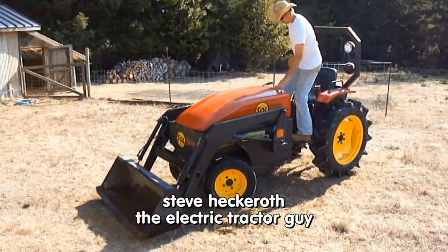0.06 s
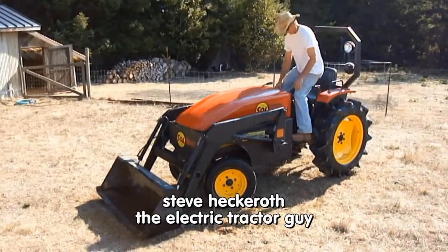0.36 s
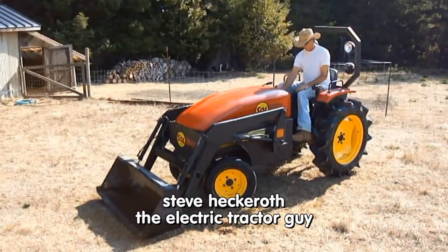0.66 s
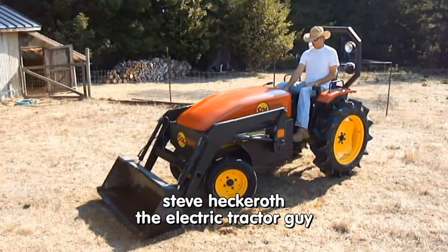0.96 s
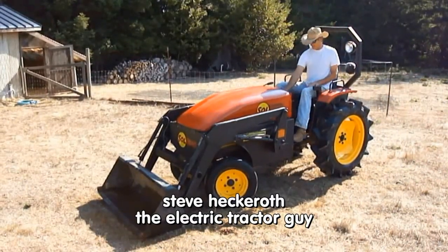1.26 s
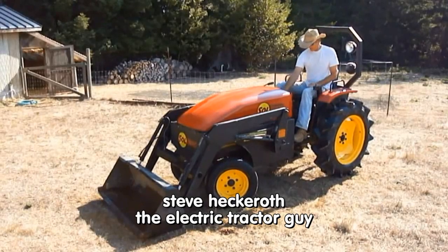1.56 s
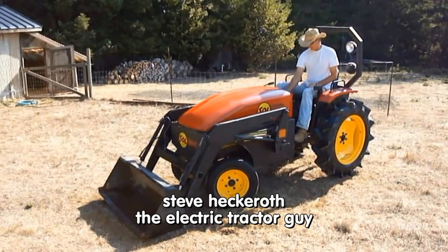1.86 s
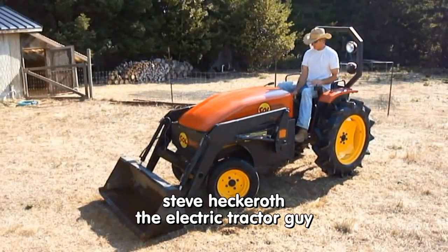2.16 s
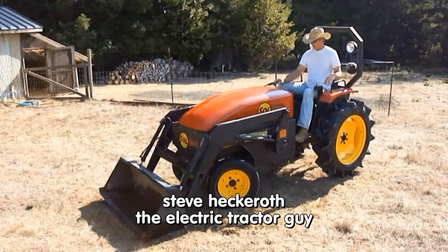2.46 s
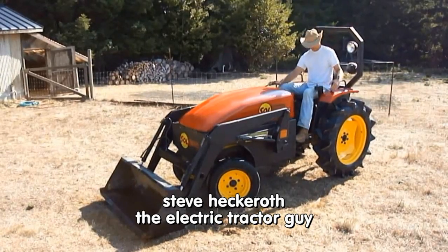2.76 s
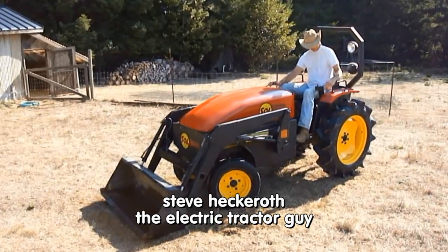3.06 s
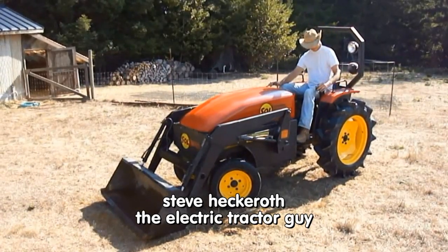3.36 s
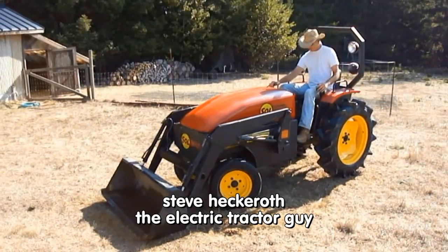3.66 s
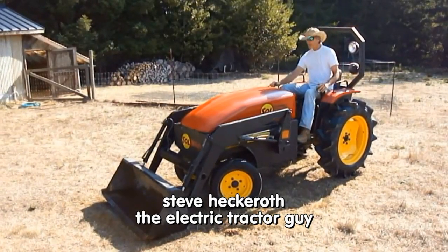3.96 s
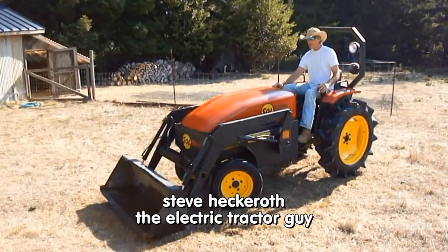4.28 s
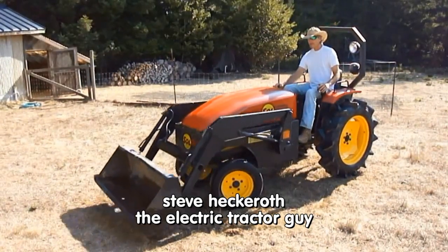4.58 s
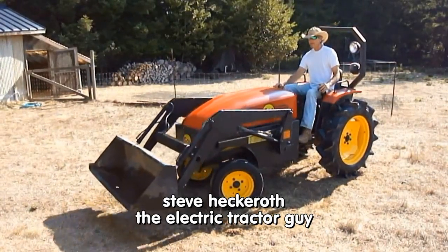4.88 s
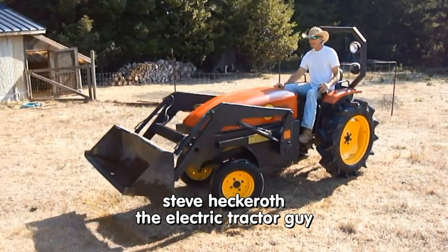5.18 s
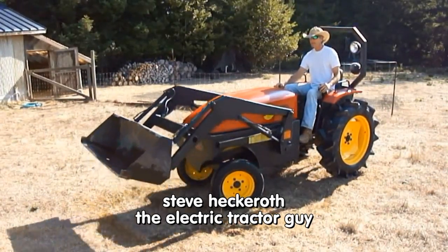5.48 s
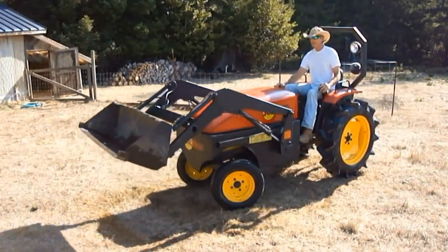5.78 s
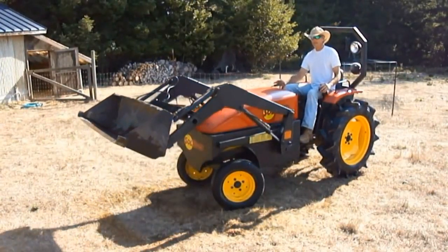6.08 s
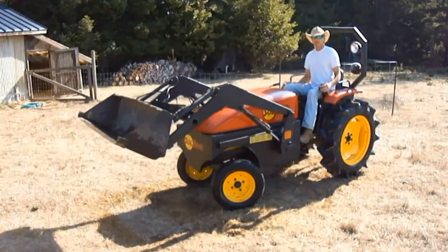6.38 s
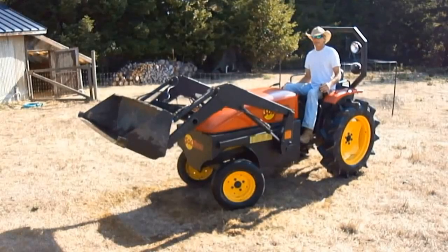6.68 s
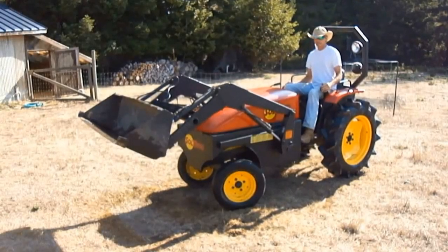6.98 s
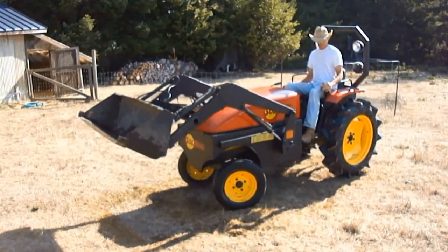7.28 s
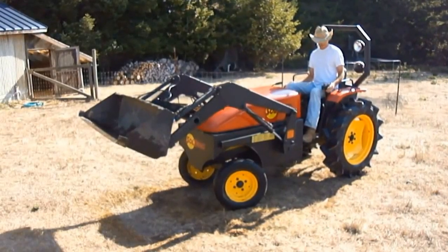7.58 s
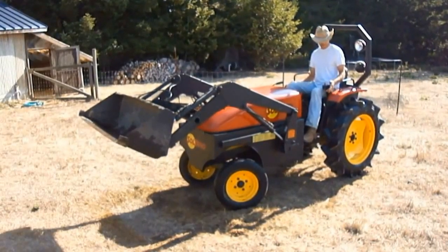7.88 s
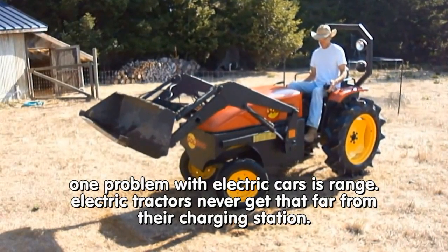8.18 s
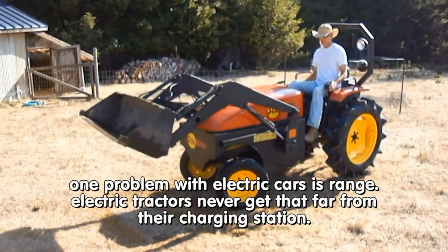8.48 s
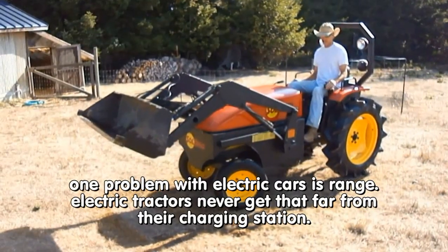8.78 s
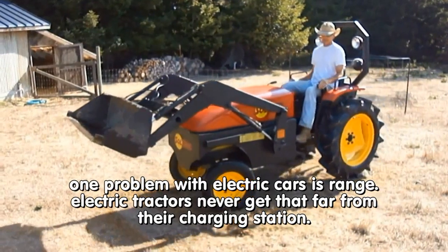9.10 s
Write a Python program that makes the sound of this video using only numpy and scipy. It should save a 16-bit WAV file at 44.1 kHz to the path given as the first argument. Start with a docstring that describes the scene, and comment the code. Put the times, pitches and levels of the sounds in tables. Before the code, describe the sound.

In a quiet field, cloth rustles on a seat with light knocks, and a switch clacks sharply on an electric tractor a few metres away. Its hydraulic pump spins up into a steady whine for about two seconds as the loader lifts, then winds down. The drive motor whirs briefly and coasts to rest. Levers clack, the gears engage with a clunk, and a low grinding begins.

```python
"""A quiet dry field, with an electric tractor a few metres away. Cloth rubs on the seat as the driver
settles and works the switches. The hydraulic gear pump spins up, its teeth pulsing the oil into a whine
while the loader lifts, and runs down. A contactor starts the brushed drive motor, which revs briefly
and coasts to rest. Levers clack, the gears take up with a clunk and the tractor moves off."""
import sys
import numpy as np
from scipy import signal
from scipy.fft import rfft, irfft, next_fast_len
from scipy.io import wavfile
from scipy.ndimage import uniform_filter1d

SR = 44100
rng = np.random.default_rng(int(sys.argv[2]) if len(sys.argv) > 2 else 0)


def wrap_up_sound(samples):
    """Save the sound to the file named by the first command line argument, as 16-bit audio."""
    columns = np.atleast_2d(samples).T
    # keep every value between -1 and 1, then stretch to whole-number steps
    tamed = np.clip(columns, -1, 1)
    steps = np.round(tamed * 32767).astype(np.int16)
    wavfile.write(sys.argv[1], SR, steps)


N = 407484
TIME = np.arange(N) / SR
PUMP_ON_S, PUMP_OFF_S, PUMP_REST_S = 4.195, 6.035, 7.05
QUIET_HZ = 253  # below this tooth rate the gears fall quiet

# Modes of the chassis. Each row: frequency in Hz, relative level in dB, t60 in seconds.
CHASSIS = [(448, -2.5, 0.11), (523, 2, 0.27), (590, -17, 0.11), (668, 8.5, 0.093), (830, -3, 0.28),
           (901, 3.5, 0.043), (1027.6, 3, 0.33), (1110, -1.5, 0.15), (1477, -2, 0.18), (1850, -15, 0.12)]
# Spectrum of the shaken panels. Each row: frequency in Hz, relative level in dB.
PANELS = [(20, -70), (45, -45), (65, -43), (110, -14), (200, -15), (320, -15.5), (480, 0), (680, 3.5),
          (1000, -5.5), (1250, -8.5), (1480, -9.5), (1900, -22.5), (3200, -25), (8000, -42)]


def amp(db):
    """Decibels to amplitude ratio."""
    return 10 ** (np.asarray(db) / 20)


def unit(x):
    """Normalisation to rms 1."""
    return x / np.sqrt(np.mean(x ** 2) + 1e-20)


def spectrum_db(points, hz):
    """Interpolation of a spectrum on a log-frequency axis."""
    f, db = np.transpose(points)
    return np.interp(np.log(hz + 1), np.log(f + 1), db)


def noise(points, size=N):
    """Spectral shaping: white noise takes on the given spectrum, at rms 1."""
    n = next_fast_len(size)
    gain = amp(spectrum_db(points, np.fft.rfftfreq(n, 1 / SR)))
    return unit(irfft(rfft(rng.standard_normal(n)) * gain, n)[:size])


def drift(rate_hz):
    """Random modulation: noise of rms 1, low-passed at the given rate."""
    count = 2048
    f = np.fft.rfftfreq(count, N / SR / count)
    slow = irfft(rfft(rng.standard_normal(count)) / (1 + (f / rate_hz) ** 2))
    return np.interp(TIME, np.linspace(0, N / SR, count), unit(slow))


def add(mix, s, sound):
    """Superposition of a sound on the mix, from second s."""
    part = mix[round(s * SR):][:len(sound)]
    part += sound[:len(part)]


def tone(turns, fade, fade_hz):
    """Multipath fading: a sine of rms 1 wanders in strength and phase as its paths shift."""
    angle = 2 * np.pi * (turns + rng.random())
    in_phase = (1 + fade * drift(fade_hz)) * np.sin(angle)
    quadrature = fade * drift(fade_hz) * np.cos(angle)
    return (in_phase + quadrature) / np.sqrt(.5 + fade ** 2)


def ring(modes, t, pitch=1):
    """Modal superposition: damped sines sum to an impulse response of energy 1."""
    out = sum(amp(db - 60 * t / t60) / np.sqrt(t60) * np.sin(2 * np.pi * (hz * pitch * t + rng.random()))
              for hz, db, t60 in modes)
    return out / np.linalg.norm(out)


def resonance(peaks, hz):
    """Forced response: the gain of a set of Lorentzian peaks at the driving frequency."""
    return sum(amp(db) / (1 + ((hz - f) / width) ** 2) for f, width, db in peaks)


def open_air():
    """Ambient noise: a broadband, nearly steady hush."""
    # Each row: frequency in Hz, relative level in dB.
    hush = [(15, -46), (25, -43), (110, -10), (173, -10.5), (202, -7.5), (274, -2), (319, -3.5), (422, -2),
            (492, -2), (573, -2), (930, -3.5), (2050, -9), (5970, -16.5), (11000, -20.5), (14300, -69),
            (22000, -120)]
    return noise(hush) * amp(-62.5 + 0.11 * drift(8.4))


def seat_rustle():
    """Stick-slip friction: cloth drags over the seat in small catches, each slide dying away."""
    # Slides. Each row: start in seconds, relative level in dB, t60 in seconds.
    slides = [(0, -64.5, .7), (.27, -58.5, 0.96), (0.788, -46.5, 1.65), (1.6, -53.5, 0.3)]
    # Friction spectrum. Each row: frequency in Hz, relative level in dB.
    cloth = [(29, -56), (50, -32), (103, -13.5), (260, -11.5), (381, -17.5), (500, -4.5), (701, -8.5),
             (983, -6), (1180, -11.5), (2270, -21), (11000, -31.5), (14300, -60), (22000, -120)]
    rise_s = 0.048
    drag = sum(np.clip((TIME - s) / rise_s, 0, 1) * amp(db - 60 * np.maximum(TIME - s - rise_s, 0) / t60)
               for s, db, t60 in slides)
    return drag * noise(cloth) * amp(2 * drift(45) - 3.5)


def knocks():
    """Impact excitation: blows shake panels, frame and loose parts; harder ones rise faster."""
    # Seat, levers, loader and gears. Each row: start in seconds, relative clunk, thump and rattle
    # levels in dB, t60 in seconds.
    blows = [(.311, -53, -79, -77, 0.06), (.395, -68, -80, -61.5, .16), (.73, -59.5, -59, -58.5, 0.12),
             (0.843, -49, -75, -71, .1), (1.092, -51, -81, -52.5, 0.16), (1.21, -63, -79, -65.5, .12),
             (1.428, -59, -80, -69, 0.069), (1.975, -60, -84, -66, 0.084), (3.974, -60.5, -78, -69, 0.22),
             (4.194, -48.5, -50.5, -82, 0.23), (4.288, -50, -56, -58, 0.74), (4.51, -56, -43.5, -60, 0.076),
             (4.535, -53, -48, -63, 0.091), (4.72, -56, -52, -68, 0.1), (6.739, -63, -85, -58.5, 0.057),
             (6.857, -53.5, -62.5, -61.5, .15), (7.18, -58, -56.5, -70, 0.38),
             (8.222, -56.5, -90, -92, 0.24), (8.399, -50.5, -64, -61, 0.32), (8.489, -46, -76, -87, 0.31),
             (9.026, -35, -58, -52, 0.1), (9.048, -42.5, -57.5, -64, 0.12)]
    # Spectra of the frame and of loose parts. Each row: frequency in Hz, relative level in dB.
    frame = [(20, -52), (45, -28), (75, -0.5), (130, 3.5), (220, 5.5), (340, 3), (700, -31.5)]
    loose_parts = [(40, -50), (500, -17), (1500, 10), (3500, 10.5), (4600, -1), (6000, 9.5), (7500, -27),
                   (11000, -10)]
    out, t = np.zeros(N), np.arange(SR // 2) / SR
    for s, clunk_db, thump_db, rattle_db, t60 in blows:
        rise_s = .0045 * .5 ** ((clunk_db + 50) / 7)  # halves with every 7 dB
        attack = np.minimum(t / rise_s, 1)
        blow = attack * amp(-60 * np.maximum(t - rise_s - 0.027 * t60, 0) / t60)
        modes = attack * ring(CHASSIS, t) * np.linalg.norm(blow)
        clunk = amp(1) * blow * noise(PANELS, len(t)) + amp(-1) * modes
        rattle = blow ** 1.2 * noise(loose_parts, len(t))
        thump = blow * noise(frame, len(t))
        add(out, s, amp(clunk_db) * clunk + amp(thump_db) * thump + amp(rattle_db) * rattle)
    return out


def clacks():
    """Contact bounce: a contact slams and chatters, ringing its own metal and the chassis."""
    # Contactor and switches. Each row: start in seconds, relative thud, ring and crack levels in dB,
    # pitch factor, most favoured ring frequency in Hz.
    contacts = [(1.641, -31.5, -41.5, -33.5, 1.0, 3040), (1.707, -66, -58, -54.5, .74, 3000),
                (2.949, -50, -52, -48, 1.1, 1590), (6.93, -43.5, -45, -42.5, 0.94, 4460),
                (7.210, -52, -46.5, -52, 0.92, 2780), (8.04, -44, -38, -41, 0.94, 4430),
                (8.097, -45.5, -47.5, -47.5, 1.21, 5030), (9.007, -38, -49, -48, 1.05, 3670),
                (9.155, -45, -43.5, -43.5, 0.91, 3080)]
    # Modes of the metal. Each row: frequency in Hz, relative level in dB, t60 in seconds.
    contactor = [(1292, 18, 0.11), (2070, -35, 0.064), (2550, -11, 0.18), (2832, 2.5, 0.092),
                 (3154, 0.5, 0.027), (3593, -4, 0.12), (3980, -1, 0.038), (4280, -9, 0.078),
                 (4950, -13, 0.039), (5300, -13, 0.047), (5540, -6, 0.044), (6360, -3, 0.055),
                 (6930, -9, 0.033)]
    # Spectrum of the crack. Each row: frequency in Hz, relative level in dB.
    crack_spectrum = [(40, -40), (400, -8), (1400, 4), (3000, 3), (4600, 0), (6200, 1.5), (7500, -5),
                      (11000, -4.5)]
    out, t = np.zeros(N), np.arange(SR // 2) / SR
    chatter_s = 0.012
    after = np.maximum(t - chatter_s, 0)
    burst = np.minimum(t / 0.0013, 1) * (amp(-60 * after / 0.07) + amp(-51 - 60 * after / 0.19))
    strength = np.linalg.norm(burst)
    for s, thud_db, ring_db, crack_db, pitch, bright_hz in contacts:
        bounces = np.exp(-t / chatter_s) * (t < chatter_s) * rng.standard_normal(len(t)) ** 3
        modes = [(hz, db - 12 * np.log2(hz * pitch / bright_hz) ** 2, t60) for hz, db, t60 in contactor]
        metal = signal.fftconvolve(ring(modes, t, pitch), bounces)[:len(t)]
        metal *= strength / np.linalg.norm(metal)
        body = strength * ring(CHASSIS, t) + amp(-60 * after / 0.18) * noise(PANELS, len(t))
        thud = np.minimum(t / 0.0091, 1) * body
        crack = burst * noise(crack_spectrum, len(t))
        add(out, s, amp(thud_db - 3.5) * thud + amp(ring_db) * metal + amp(crack_db) * crack)
    return out


def pump_motion():
    """Inertia and drag: the pump spins up, sags under load and coasts. Gives tooth rate and pressure."""
    top_hz, spin_up_s, sag_hz_per_s, coast_s = 765.1, .145, 9.3, .635
    build_s, dump_s = 0.67, 0.07
    on, off = np.maximum(TIME - PUMP_ON_S, 0), np.maximum(TIME - PUMP_OFF_S, 0)
    driven_hz = (top_hz - sag_hz_per_s * (on - off)) * (1 - np.exp(-on / spin_up_s))
    stopping = np.clip(3.8 * (PUMP_REST_S - TIME), 0, 1)
    pressure = np.minimum(on / build_s, 1) * np.exp(-off / dump_s)  # 0 to 1
    return driven_hz / (1 + off / coast_s) ** 2 * stopping, pressure


def housing_rattle(turns, tooth_hz):
    """Swept resonance: upper tooth harmonics flare as they glide through the housing's modes."""
    # Each row: frequency in Hz, half-width in Hz, relative gain in dB.
    housing = [(1000, 21, -52), (1404, 47, -45.5), (1940, 50, -55), (2850, 140, -52)]
    return sum(resonance(housing, k * tooth_hz) * tone(k * turns, fade=0.13, fade_hz=12) / np.sqrt(k)
               for k in range(3, 8))


def pump():
    """Flow ripple: each tooth pulses the oil; shaft and bearing add tones; the flow roars and hisses."""
    # Swells of the whine. Each row: time in seconds, relative tooth, octave and overtone levels in dB.
    swells = [(4.74, -38.5, -49, -4.5), (4.85, -40, -37, 0), (5.04, -48, -43.5, -1),
              (5.24, -50.5, -39.5, -0.5), (5.39, -38.5, -52, 0), (5.58, -39.5, -37, -2),
              (5.8, -34, -36.5, -1.5), (5.99, -40, -39.5, -2), (6.1, -37.5, -47, -6)]
    # Resonances of casing and rubber mounting. Each row: frequency in Hz, half-width in Hz, gain in dB.
    casing = [(281, 34, -15.5), (415, 41, -5.5), (495, 22, 4.5), (533, 22, 2), (642, 21, 3.5), (694, 8, 7),
              (752.7, 14.4, 0.5)]
    mounting = [(121, 8.2, -57), (172, 29, -66.5)]
    # Modes of the loader arms. Each row: frequency in Hz, relative level in dB, t60 in seconds.
    loader = [(486, 8, 0.96), (634, -19, 0.44), (803, -7, .35), (1020, -5, .4), (1430, -3, .4),
              (1503, -17, 1.2)]
    # Harmonics of the tooth, shaft and ball rates. Each row: multiple of that rate, relative level in dB.
    tooth_orders = [(3, -59.5), (4, -49.5), (5, -56.5), (6, -63), (7, -66), (8, -63.5), (9, -63),
                    (10, -65.5), (11, -64), (12, -82), (13, -68), (14, -61)]
    shaft_orders = [(3, -64.5), (7, -60), (8, -53.5), (9, -70), (10, -57.5), (12, -42.5), (13, -50.5),
                    (15, -53.5), (16, -55), (19, -65), (20, -51.5), (21, -57.5), (23, -59.5), (32, -60),
                    (35, -60.5), (64, -62)]
    ball_orders = [(2, -63.5), (3, -68), (4, -46.5), (5, -51), (6, -49.5)]
    # Spectra of the oil flow. Each row: frequency in Hz, relative level in dB.
    oil_rumble = [(15, -45), (35, -34), (60, -30), (120, -15), (200, -13.5), (300, -6.5), (370, -6.5),
                  (500, 1.5), (680, 2), (950, 0), (1250, -10), (1700, -12), (2500, -36.5)]
    oil_hiss = [(40, -52), (700, -4), (1400, 9.5), (2000, 5.5), (2550, -2.5), (3000, 6.5), (3400, -1.5),
                (3900, 3.5), (5000, -7.5), (6000, -2.5), (7500, -8.5), (8400, -3.5), (9400, -10),
                (10600, -7.5)]
    teeth, balls_per_turn, bite_s = 11, 2.625, 0.18

    tooth_hz, pressure = pump_motion()
    speed, slack = tooth_hz / tooth_hz.max(), 1 - pressure
    flow = speed ** 1.82 * amp(7 * slack)
    jitter = (.0007 + .0035 * slack) * drift(35)  # an unloaded pump runs less evenly
    turns = np.cumsum(tooth_hz * (1 + jitter)) / SR
    shaft_turns = turns / teeth
    ball_turns, ball_hz = balls_per_turn * shaft_turns, balls_per_turn * tooth_hz / teeth

    s, *levels_db = np.transpose(swells)
    tooth_gain, octave_gain, overtone_gain = (amp(np.interp(TIME, s, db)) for db in levels_db)
    tooth = tooth_gain * speed ** 0.37 * resonance(casing, tooth_hz) * tone(turns, fade=0.2, fade_hz=21.5)
    octave = octave_gain * speed ** 0.7 * tone(2 * turns, fade=0.092, fade_hz=22)
    # the teeth take a moment to bite on the oil
    biting = np.clip((TIME - PUMP_ON_S) / bite_s, 0, 1) ** 2 * np.minimum(tooth_hz / QUIET_HZ, 1) ** 2
    whine = biting * (tooth + octave)
    arms = amp(-30) * signal.oaconvolve(whine, ring(loader, np.arange(SR) / SR))[:N]
    rattle = amp(3) * slack ** 1.1 * np.sqrt(flow) * biting * housing_rattle(turns, tooth_hz)

    overtones = sum(amp(db) * tone(k * turns, fade=0.27, fade_hz=7.7) for k, db in tooth_orders)
    # eccentric gears flank each overtone with sidebands
    overtones *= 1 + sum(0.17 * tone(k * shaft_turns, fade=0.44, fade_hz=7.1) / k for k in range(1, 4))
    motor = tone(29.36 * shaft_turns, fade=0.98, fade_hz=21)
    # unequal teeth sound at multiples of the shaft rate
    shaft = sum(amp(db) * tone(k * shaft_turns, fade=0.26, fade_hz=8.4) for k, db in shaft_orders)
    bearing = sum(amp(db) * tone(k * ball_turns, fade=0.14, fade_hz=2.7) for k, db in ball_orders[1:])
    mount = biting * resonance(mounting, ball_hz) * tone(ball_turns, fade=0.22, fade_hz=8.6)
    one_turn = noise(oil_hiss, size=648)  # worn tooth flanks repeat the same rasp every turn
    rasp = np.interp(shaft_turns % 1, np.linspace(0, 1, len(one_turn)), one_turn)
    loaded = pressure * (amp(-1) * overtone_gain * overtones + amp(-54.5) * (motor + rasp))
    turning = flow * speed * (amp(-2.5) * shaft + amp(-3.5) * bearing)

    throb = 1 + 0.028 * np.cos(2 * np.pi * shaft_turns)  # the flow swells once a turn
    rumble = speed ** 1.63 * amp(-47 + 10 * slack + drift(23)) * noise(oil_rumble)
    hiss = amp(-48) * flow * noise(oil_hiss)
    return whine + rattle + arms + mount + loaded + turning + throb * (rumble + hiss)


def brush_noise(turns):
    """Sliding friction: brushes scrape the commutator bars and ring their holders."""
    # Modes of the holders. Each row: frequency in Hz, relative level in dB, t60 in seconds.
    holders = [(5200, -6, 0.069), (6340, -4, 0.021), (6750, -1, 0.013), (7070, 0, 0.062), (8200, -4, 0.028),
               (8400, 3, 0.034), (9250, -8, 0.034), (9660, -18, .05), (10070, -3, 0.022)]
    # Spectrum of the scraping. Each row: frequency in Hz, relative level in dB.
    brushes = [(40, -58), (1500, 7.5), (3300, 2.5), (4400, -9), (6400, 0.5), (7700, -2.5), (10000, -6),
               (11000, -13)]
    bars = 1 + 0.37 * np.cos(2 * np.pi * turns)
    scrape, t = bars * rng.standard_normal(N), np.arange(SR // 8) / SR
    # each holder swells and fades as its brush shifts
    singing = sum(amp(db + 4.2 * drift(3.3)) * signal.oaconvolve(scrape, ring([(hz, 0, t60)], t))[:N]
                  for hz, db, t60 in holders)
    return amp(-1) * bars * noise(brushes) + amp(-0.5) * unit(singing) + amp(-8) * noise(PANELS)


def drive_motor():
    """Gear meshing: harmonics sweep the gearbox resonances as the motor revs and friction slows it."""
    # Runs. Each row: on and off times in seconds, target mesh rate in Hz, relative whine and brush
    # levels in dB.
    runs = [(6.932, 7.227, 1336, -58.5, -56), (9.135, 9.4, 824, -48, -61)]
    # Response of the gearbox. Each row: frequency in Hz, gain in dB.
    gearbox = [(150, -8), (400, -2), (620, -3), (830, 12), (1080, -3), (1300, 2), (1650, 2), (2100, 4),
               (2600, -2.5), (3200, 9), (4000, -37), (6000, -21)]
    rev_s, brake_hz_per_s, freewheel_s = .05, 1830, 0.023
    out = np.zeros(N)
    for on_s, off_s, top_hz, whine_db, brush_db in runs:
        on, off = np.maximum(TIME - on_s, 0), np.maximum(TIME - off_s, 0)
        mesh_hz = np.maximum(top_hz * (1 - np.exp(-on / rev_s)) - brake_hz_per_s * off, 0)
        speed = mesh_hz / top_hz
        turns = np.cumsum(mesh_hz * (1 + .007 * drift(60))) / SR
        harmonics = sum(amp(spectrum_db(gearbox, k * mesh_hz) - 5.5 * np.log2(k))
                        * tone(k * turns, fade=0.76, fade_hz=35.2) for k in range(1, 8))
        biting = np.minimum(on / 0.12, 1) * np.minimum(mesh_hz / QUIET_HZ, 1) ** 2
        whine = amp(whine_db) * speed ** 0.38 * biting * harmonics
        hiss = amp(brush_db) * speed ** 1.43 * brush_noise(turns)
        # with the current off, loose gears and brushes sound louder
        loose = np.clip(1 + (TIME - off_s) / freewheel_s, 0, 1)
        out += amp(3 * loose) * (whine + hiss)
    return out


def frame_groans():
    """Forced vibration: the frame gives short, sinking tones as the drive motor takes up torque."""
    # Each row: time of the peak in seconds, frequency there in Hz, level in dB.
    groans = [(6.939, 254, -58.5), (7.07, 259, -56), (7.199, 197, -54.5)]
    width_s, sag_hz_per_s = 0.043, 400
    out = np.zeros(N)
    for s, hz, db in groans:
        t = TIME - s
        turns = hz * t - sag_hz_per_s * t ** 2 / 2
        out += amp(db) * np.exp(-(t / width_s) ** 2) * tone(turns, fade=0.55, fade_hz=29.07)
    return out


def rolling():
    """Structure-borne sound: loaded gears grind unevenly into the chassis."""
    # Rise of the rumble under load. Each row: time in seconds, relative level in dB.
    rise = [(8.7, -73), (9.06, -44), (9.24, -40)]
    s, db = np.transpose(rise)
    swell = uniform_filter1d(amp(np.interp(TIME, s, db, left=-140, right=-140)), 128)
    grind = noise(PANELS)
    body = unit(signal.oaconvolve(grind, ring(CHASSIS, np.arange(SR // 3) / SR))[:N])
    return swell * (amp(-1.5) * grind + amp(-3) * body) * amp(1.7 * drift(35))


def field_echo(x):
    """Scattering: the shed and the trees return a dull, decaying echo."""
    t = np.arange(SR // 2) / SR
    delay_s, t60 = .03, 0.3
    tail = noise([(100, 10.5), (700, -1), (3000, -1), (10000, -17)], len(t))
    tail *= amp(-60 * t / t60) * (t > delay_s)
    return signal.oaconvolve(x, tail / np.linalg.norm(tail))[:N]


def scene():
    """Superposition: the tractor and its faint echo over the hush of open air."""
    tractor = pump() + drive_motor() + frame_groans() + clacks() + knocks() + seat_rustle() + rolling()
    return (tractor + open_air() + amp(-19.5) * field_echo(tractor))[None]


def record(dry):
    """Band limiting: a steep low-pass filter removes the highest treble."""
    edge_hz = 11100
    low_pass = signal.firwin(511, edge_hz, window=("kaiser", 8), fs=SR)
    return signal.oaconvolve(dry, low_pass[None], "same")


dry = scene()
out = record(dry)
wrap_up_sound(out)
```